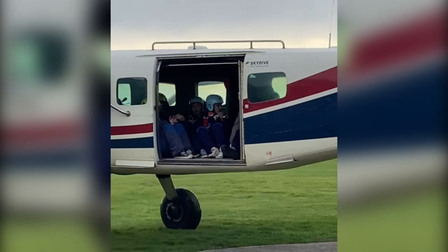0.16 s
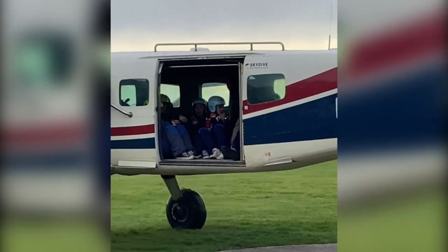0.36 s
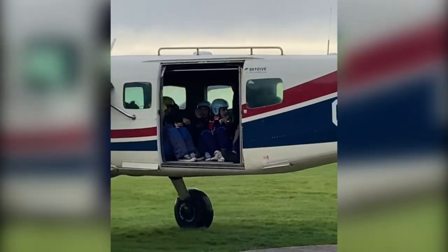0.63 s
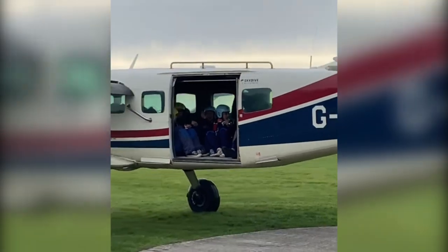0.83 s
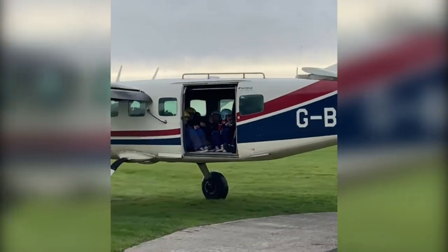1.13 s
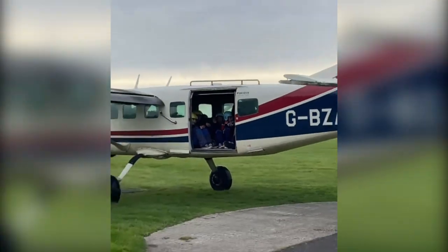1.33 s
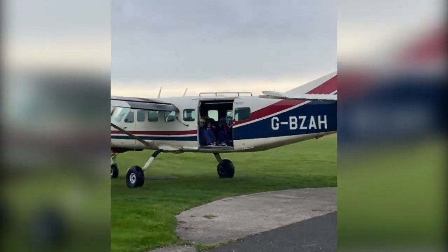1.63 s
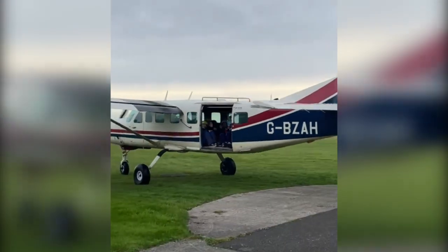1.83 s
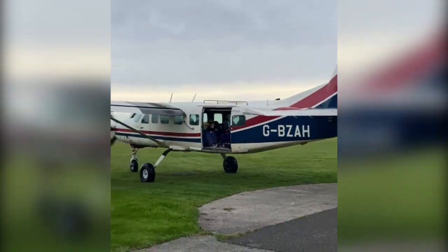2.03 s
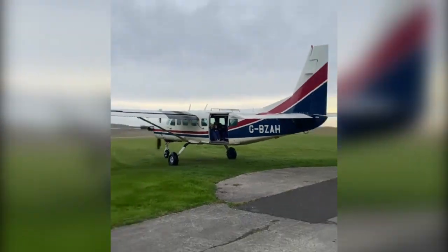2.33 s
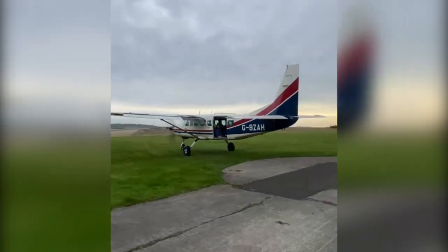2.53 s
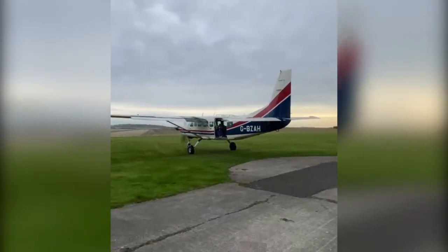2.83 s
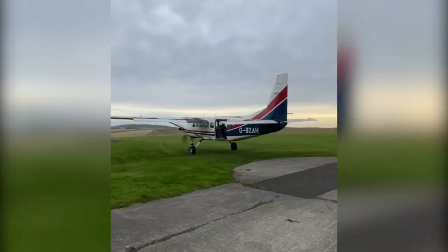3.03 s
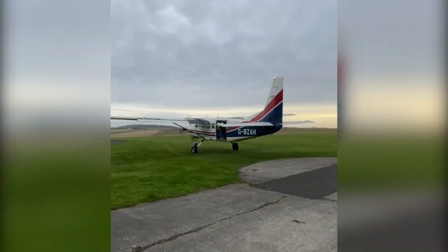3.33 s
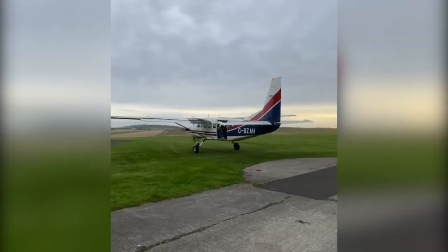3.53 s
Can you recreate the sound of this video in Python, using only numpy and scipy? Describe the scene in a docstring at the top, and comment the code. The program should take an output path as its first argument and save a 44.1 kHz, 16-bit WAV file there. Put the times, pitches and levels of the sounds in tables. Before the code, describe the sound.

A single-engine turboprop drones loudly, its fast propeller beat buzzing over low exhaust roar and airy hiss; it taxis away across an open grass airfield, gradually softening, captured by a handheld phone in stereo.

```python
"""Turboprop taxiing away

A single-engine turboprop taxis away over a grass airfield, heard through a phone's two microphone ports.
The propeller is a harmonic series at about 94 blade passages a second; roar and slipstream are shaped noise.
The exhaust stub's hoot and the compressor's whine are noise in a resonance.
The ports differ in phase and level by frequency, and their pattern widens as the view zooms out."""
import sys
import numpy as np
from scipy import signal
from scipy.fft import rfft, irfft
from scipy.io import wavfile

SR = 44100
rng = np.random.default_rng(int(sys.argv[2]) if len(sys.argv) > 2 else 0)


def file_out(sig):
    """Save sig as 16-bit WAV at sys.argv[1]."""
    # one column per channel
    cols = np.atleast_2d(sig).T
    # limit, then scale
    lim = np.clip(cols, -1, 1)
    pcm = np.round(lim * 32767).astype(np.int16)
    wavfile.write(sys.argv[1], SR, pcm)


N = 162288
T = np.arange(N) / SR
HZ = np.maximum(np.arange(N // 2 + 1) * SR / N, 1)


def amp(db):
    """Decibel definition: an amplitude ratio is 10^(dB/20)."""
    return 10 ** (np.asarray(db) / 20)


def rms_one(x):
    """Normalisation to unit root mean square."""
    return x / np.sqrt(np.mean(x ** 2) + 1e-20)


def in_time(rows):
    """Linear interpolation in time of each column after t."""
    times, *columns = np.transpose(rows)
    return [np.interp(T, times, column) for column in columns]


def at_hz(points, hz, axis=1):
    """Interpolation of one column along logarithmic frequency."""
    points = np.array(points)
    return np.interp(np.log(hz), np.log(points[:, 0]), points[:, axis])


def drift(rate_hz):
    """Random modulation: white noise through a double real pole at rate_hz, near unit spread."""
    step = 32  # samples between computed points
    pole = np.exp(-2 * np.pi * rate_hz * step / SR)
    white = rng.standard_normal(N // step + 2002)
    slow = signal.lfilter([1], [1, -2 * pole, pole * pole], white)[2000:]
    return np.interp(np.arange(N) / step, np.arange(len(slow)), rms_one(slow - slow.mean()))


def patchy_noise(shape, patchy_db, rate_hz):
    """Turbulence as shaped noise whose overlapping bands swell mostly alone, slightly together; rms 1."""
    spectrum = rfft(rng.standard_normal(N)) * amp(at_hz(shape, HZ)) * (HZ > shape[0][0] / 2)
    out, together = 0, drift(rate_hz)
    lowest, highest = np.log2(shape[0][0]) - 1, np.log2(shape[-1][0]) + 1
    for centre in np.arange(lowest, highest, .5):  # octaves
        band = np.cos(np.pi / 2 * np.clip((np.log2(HZ) - centre) * 2, -1, 1)) ** 2
        swell_db = patchy_db * (0.093 * together + drift(rate_hz))
        out = out + amp(swell_db) * irfft(spectrum * band, N)
    return rms_one(out)


def resonant_noise(centre_hz, width_hz):
    """Resonance: noise peaked at centre_hz, width_hz wide at half amplitude; rms 1."""
    response = 1 / (1 + (2 * (HZ - centre_hz) / width_hz) ** 2)
    return rms_one(irfft(rfft(rng.standard_normal(N)) * response, N))


# blade passage rate: t/s, f/Hz
BLADE_RATE = [(0, 92.2), (.46, 92.8), (.94, 93.7), (1.77, 94.6), (2.18, 94.95), (2.45, 94.6), (2.75, 94.7),
              (2.9, 95.0), (3.68, 95.1)]
FIRST_TURN = 1.747  # starting phase, rad


def blade_passage():
    """Phase is the time integral of frequency: one cycle is one blade passage."""
    rate_hz, = in_time(BLADE_RATE)
    return rate_hz, FIRST_TURN + 2 * np.pi * np.cumsum(rate_hz) / SR


# relative strength of the blade harmonics: f/Hz, level/dB
SLAP_COLOUR = [(90, -1.5), (190, 5.5), (280, -4), (380, -6), (470, -1), (600, -3.5), (850, -3.5),
               (1100, -6), (1400, -5), (2400, -23.5), (3300, -23.5)]
# loudness of the slap as the plane turns away: t/s, low level/dB, middle level/dB, upper level/dB
SLAP_LEVEL = [(0, -33, -38, -35), (.5, -36.5, -37.5, -35.5), (.9, -29, -34, -38), (1.3, -30, -33, -37),
              (1.7, -31.5, -35, -38), (2.15, -26, -31, -34.5), (2.55, -30.5, -32, -35),
              (2.75, -39.5, -35, -38), (3.2, -40.5, -35, -40), (3.68, -39.5, -42, -35)]
# centres of the low, middle and upper bands: f/Hz
SLAP_BANDS_HZ = [470, 850, 1450]
# a band of the slap swells briefly: centre t/s, length/s, centre f/Hz, gain level/dB
SWELLS = [(0.105, 0.18, 990, 9), (0.087, 0.39, 1400, 5), (0.392, 0.09, 1330, 7), (0.8, 0.16, 1480, 6),
          (1.31, 0.17, 830, 11), (1.69, 0.4, 980, 11), (1.74, 0.36, 2400, 11), (1.99, 0.2, 820, 12),
          (2.174, .2, 1550, 8), (2.42, 0.22, 800, 5.5), (2.655, .09, 1100, 7), (2.72, .07, 930, 7),
          (2.82, .14, 1170, 8), (2.75, .8, 2080, 11), (2.975, .1, 960, 7), (3.14, 0.16, 1380, 9),
          (3.19, .15, 870, 7), (3.305, 0.1, 1130, 9), (3.45, 0.12, 1220, 8)]
SWELL_HZ = 215  # half width
WAVER_DB, OWN_WAVER_DB, WAVER_HZ = 1.4, 1.0, 9  # shared by neighbouring harmonics; each one's own
JITTER_S, JITTER_HZ = .00004, 25.4  # blade timing
UNEVEN_DB, UNEVEN_HZ = 1.6, 45  # stroke-to-stroke strength at the upper band, in proportion to frequency
SPREAD_RAD = .016  # phase lag per squared distance from the ninth harmonic
BRIGHTEN_DB = 1  # rise per second and octave above the upper band


def slap_level_db(k, hz, levels):
    """Spectral envelope in time: band levels and passing swells at the k-th harmonic."""
    shares = [np.interp(np.log(hz), np.log(SLAP_BANDS_HZ), row) for row in np.eye(3)]
    level_db = shares @ levels if k > 2 else levels.mean()  # the lowest two keep one steady level
    for time, length, centre_hz, gain_db in SWELLS:
        if abs(hz - centre_hz) < 2 * SWELL_HZ:
            distance = ((hz - centre_hz) / SWELL_HZ) ** 4 + (2 * (T - time) / length) ** 4
            level_db = level_db + gain_db * np.exp(-distance)
    octaves_above = max(np.log2(hz / SLAP_BANDS_HZ[-1]), 0)
    return level_db + BRIGHTEN_DB * T * octaves_above + at_hz(SLAP_COLOUR, hz)


def slaps(turn, rate_hz):
    """Fourier synthesis: phase-related blade harmonics make each passage a short pulse of shifting colour."""
    groups, levels = [drift(WAVER_HZ) for _ in range(11)], np.array(in_time(SLAP_LEVEL))
    turn = turn + 2 * np.pi * rate_hz * JITTER_S * drift(JITTER_HZ)
    uneven_db = UNEVEN_DB * drift(UNEVEN_HZ)
    out = 0
    for k in range(1, 35):
        hz = k * rate_hz.mean()
        group, part = divmod(k / 4, 1)
        shared = (1 - part) * groups[int(group)] + part * groups[int(group) + 1]
        waver_db = WAVER_DB * shared + OWN_WAVER_DB * drift(WAVER_HZ)
        db = slap_level_db(k, hz, levels) + waver_db + uneven_db * hz / SLAP_BANDS_HZ[-1]
        phase = k * turn - SPREAD_RAD * (k - 9) ** 2 + .3 * drift(3)
        out = out + amp(db) * np.sin(phase)
    return out


# slipstream before trim and gating: t/s, body level/dB, hiss level/dB
WASH = [(0, -34.5, -44.5), (1.1, -34.5, -44), (2.1, -35, -48), (2.7, -37, -50.5), (3.68, -41, -53)]
# spectrum of the body: f/Hz, level/dB (per Hz)
BODY_SHAPE = [(250, -18), (420, -6), (900, -4), (2000, -5.5), (2500, -6), (3200, -17), (4500, -29)]
# spectrum of the hiss: f/Hz, level/dB (per Hz)
HISS_SHAPE = [(1800, -0.5), (3000, -1), (5800, 1), (6500, -6), (8400, 0.5), (9300, -10.5), (11000, -12.5),
              (11700, -21)]
# the wash spits: t/s, gain level/dB
GUSTS = [(1.108, 4), (1.17, 5)]
GUST_S = 0.007  # half length
BODY_DB, HISS_DB = -1, 12  # trims added to the table
BODY_GATE_DB, HISS_GATE_DB, GATE_SHARP = 10, 3, 2.2  # swell at each blade passage
BODY_PATCHY_DB, HISS_PATCHY_DB = 1.2, 1.4


def slipstream(turn):
    """Amplitude modulation: turbulent noise, in a body and a hiss, swells with each blade."""
    body_db, hiss_db = in_time(WASH)
    spit_db = sum(db * np.exp(-((T - time) / GUST_S) ** 2) for time, db in GUSTS)
    passage = ((1 + np.cos(turn)) / 2) ** GATE_SHARP
    body_gain = amp(body_db + BODY_DB + spit_db + BODY_GATE_DB * passage)
    hiss_gain = amp(hiss_db + HISS_DB + spit_db + HISS_GATE_DB * passage)
    body = body_gain * patchy_noise(BODY_SHAPE, BODY_PATCHY_DB, 16.0)
    hiss = hiss_gain * patchy_noise(HISS_SHAPE, HISS_PATCHY_DB, 15.0)
    return body + hiss


PIPE_HZ, PIPE_WIDTH_HZ, PIPE_DB = 504.4, 95, -38
PIPE_FOLLOWS = 2.7  # dB of change per dB of change in the slipstream body


def exhaust_stub():
    """Pipe resonance: noise hoots at one mode and fades faster than the slipstream body."""
    body_db = in_time(WASH)[0]
    level_db = PIPE_DB + PIPE_FOLLOWS * (body_db - body_db.mean())
    return amp(level_db) * resonant_noise(PIPE_HZ, PIPE_WIDTH_HZ)


WHINE_HZ, WHINE_WIDTH_HZ = 7180, 150
WHINE_DB = 6.5  # above the hiss column of the slipstream table


def compressor_whine():
    """Narrow-band noise: a noisy tone that follows the hiss level."""
    hiss_db = in_time(WASH)[1]
    return amp(hiss_db + WHINE_DB) * resonant_noise(WHINE_HZ, WHINE_WIDTH_HZ)


# exhaust roar before trim: t/s, level/dB
ROAR_LEVEL = [(0, -20.5), (1.7, -19.5), (2.4, -21), (3.68, -23)]
# spectrum of the roar: f/Hz, level/dB (per Hz)
ROAR_SHAPE = [(25, -44), (40, -30.5), (60, -11), (165, -10), (205, 0), (240, -9), (290, -17.5), (420, -31)]
ROAR_DB, ROAR_PATCHY_DB = -1, 1  # trim; swell of the noise bands


def exhaust_roar():
    """Broadband jet noise: low shaped noise with slowly swelling bands."""
    level_db = in_time(ROAR_LEVEL)[0] + ROAR_DB
    return amp(level_db) * patchy_noise(ROAR_SHAPE, ROAR_PATCHY_DB, 2.2)


SCATTER_S = .04  # decay time of the random echo pattern


def scatter(spectrum):
    """Diffuse arrival: decaying random echoes, apart for each port, alter phase but not magnitude."""
    echoes = rfft(rng.standard_normal((2, N)) * np.exp(-T / SCATTER_S))
    return spectrum * echoes / np.abs(echoes)


# treble shared by both port patterns:
# f/Hz, left lead/half turns, left minus right level/dB, scattered share level/dB
PORTS_TREBLE = [(5950, .45, 0, -4), (6550, .97, 0, -18), (6850, 1, 0, -60), (7950, 1, 0, -60),
                (8300, 1.1, 0, -7), (8900, 1.5, 0, -4), (9600, 2, 0, -60)]


def ports(direct, scattered, pattern):
    """Interchannel phase and level difference, with partial coherence from each port's own echoes."""
    pattern = [*pattern, *PORTS_TREBLE]
    lead = np.pi * at_hz(pattern, HZ)
    pan_db = at_hz(pattern, HZ, axis=2)
    loose = amp(at_hz(pattern, HZ, axis=3))
    side = np.array([[.5], [-.5]])  # each port takes half the difference
    mixed = np.sqrt(1 - loose ** 2) * direct + loose * scattered
    return irfft(amp(side * pan_db) * np.exp(1j * side * lead) * mixed, N)


# narrow, then wide, port pattern below the treble:
# f/Hz, left lead/half turns, left minus right level/dB, scattered share level/dB
PORTS_NARROW = [(60, 0, 0, -30), (690, .02, -1.2, -16), (1100, .03, .8, -20), (1750, 0, 0, -28),
                (2450, .07, 0, -13), (3400, 0, 0, -30), (4450, .05, 0, -13), (5100, .02, 0, -22)]
PORTS_WIDE = [(60, 0, -1, -26), (190, 0, -5.5, -16), (400, -.03, -5, -11), (690, .42, -1, -9),
              (1050, .14, 4, -13), (1700, .04, 2, -18), (2700, .5, -2, -4), (3500, .87, 0, -4),
              (4300, .55, 1.5, -2), (5200, .12, -.5, -9)]
WIDEN_S, WIDEN_TAKES_S = 2.33, 0.29  # middle and length of the widening


def scene():
    """Superposition: the sources add, then the narrow port pattern cross-fades to the wide one."""
    rate_hz, turn = blade_passage()
    plane = slaps(turn, rate_hz) + slipstream(turn) + exhaust_stub() + compressor_whine() + exhaust_roar()
    direct = rfft(plane)
    scattered = scatter(direct)
    wide = np.clip((T - WIDEN_S) / WIDEN_TAKES_S + .5, 0, 1)
    narrow_part = (1 - wide) * ports(direct, scattered, PORTS_NARROW)
    return narrow_part + wide * ports(direct, scattered, PORTS_WIDE)


CUTOFF_HZ = 11800


def record(dry):
    """Low-pass filtering: a steep elliptic filter removes the top."""
    return signal.sosfilt(signal.ellip(14, .5, 75, CUTOFF_HZ, fs=SR, output="sos"), dry)


dry = scene()
out = record(dry)
file_out(out)
```